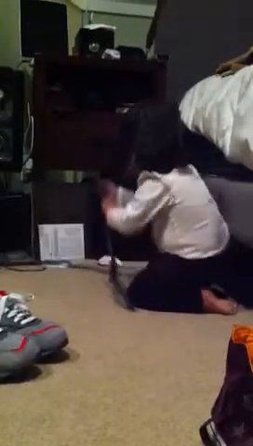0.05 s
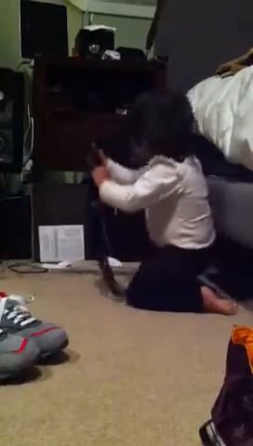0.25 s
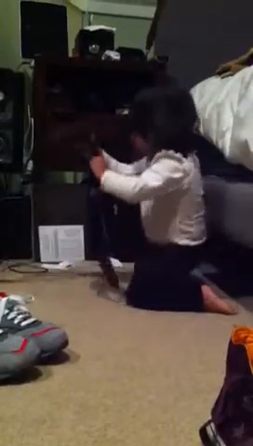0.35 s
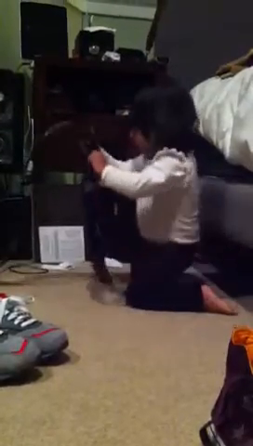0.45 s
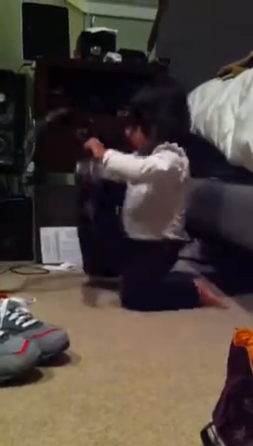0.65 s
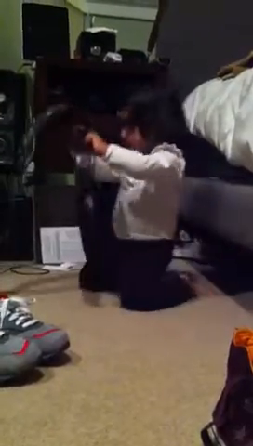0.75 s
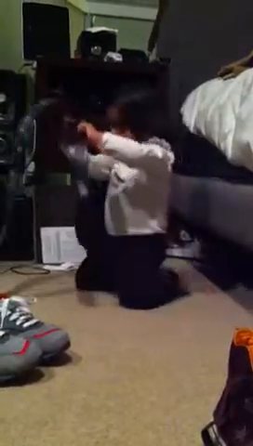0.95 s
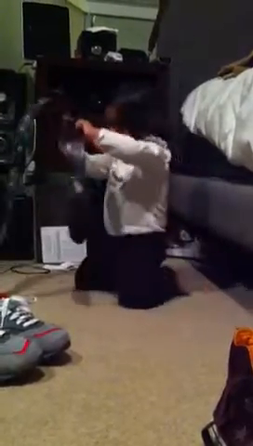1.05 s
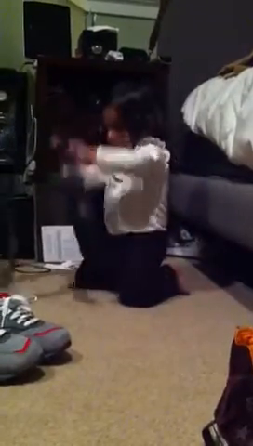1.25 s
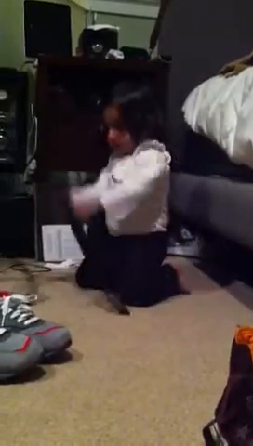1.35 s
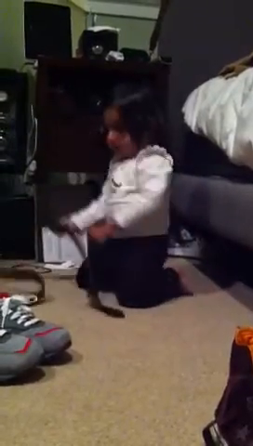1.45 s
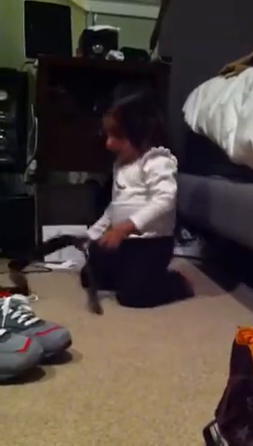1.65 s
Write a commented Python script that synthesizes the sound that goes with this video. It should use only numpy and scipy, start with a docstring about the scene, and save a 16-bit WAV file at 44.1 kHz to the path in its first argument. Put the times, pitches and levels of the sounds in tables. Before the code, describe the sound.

A metal belt buckle jangles with a strap slap, then clinks twice in a quiet bedroom.

```python
"""A strap's metal buckle jangles as the strap snaps taut with a slap, then clinks twice more as a child
lifts it and flings it down. Each contact clicks, chatters and rings the buckle's modes until the strap
mutes them. The slap is a noise crack with a hollow ring, answered by a small, quiet bedroom.
Soft bumps on the carpet and rustling clothes lie over a faint hiss."""
import sys
import numpy as np
from scipy import signal
from scipy.fft import rfft, irfft, next_fast_len
from scipy.io import wavfile
from scipy.ndimage import map_coordinates

SR = 44100
rng = np.random.default_rng(int(sys.argv[2]) if len(sys.argv) > 2 else 0)


def put_to_file(sound):
    """Save the sound as 16-bit audio at rate SR, in the file named by the first command-line argument."""
    columns = np.atleast_2d(sound).T  # one column per channel
    safe = np.clip(columns, -1, 1)
    whole_steps = np.round(safe * 32767)
    wavfile.write(sys.argv[1], SR, whole_steps.astype(np.int16))


N = 74970
EVENT_N = SR // 2
EVENT_S = np.arange(EVENT_N) / SR  # time axis of one event

# Rubbing fabric spectrum. Each row: frequency in Hz, level in dB.
CLOTH_SPECTRUM = [(35, -71), (60, -7), (138, -111), (162, -8), (276, -7), (332, -10.5), (381, -8),
                  (695, -9.5), (2840, -13), (3580, -14.5), (15000, -36.5)]


def amp(db):
    """Decibels to gain."""
    return 10 ** (np.asarray(db) / 20)


def unit(x):
    """Scale to rms 1."""
    return x / np.sqrt(np.mean(x ** 2) + 1e-20)


def along(points, hz):
    """Interpolate (Hz, value) points on a log frequency axis."""
    points_hz, values = np.transpose(points)
    return np.interp(np.log(hz + 1), np.log(points_hz + 1), values)


def fade(t60_s, t=EVENT_S):
    """Exponential decay, 60 dB in t60_s."""
    return np.exp(-np.log(1000) * t / t60_s)


def noise(spectrum, size=EVENT_N):
    """Coloured noise of rms 1."""
    gain = amp(along(spectrum, np.fft.rfftfreq(size, 1 / SR)))
    return unit(irfft(rfft(rng.standard_normal(size)) * gain, size))


def coloured(x, spectrum):
    """Minimum-phase filter with the given (Hz, dB) gain."""
    size = len(x)
    gain = amp(along(spectrum, np.fft.rfftfreq(size, 1 / SR)))
    cepstrum = irfft(np.log(gain), size)
    causal_fold = np.where(np.arange(size) < size // 2, 2, 0) - (np.arange(size) == 0)
    return irfft(rfft(x) * np.exp(rfft(cepstrum * causal_fold)), size)


def low_cut(x, hz):
    """High-pass: microphone low-cut that thins the bass of the slap and bumps."""
    return signal.sosfilt(signal.butter(3, hz, "highpass", fs=SR, output="sos"), x)


def add(track, start_s, sound):
    """Mix a sound in at start_s."""
    part = track[max(round(start_s * SR), 0):][:len(sound)]
    part += sound[:len(part)]


def mode(hz, t60_s, attack_s):
    """One damped vibration."""
    return np.sin(2 * np.pi * hz * EVENT_S) * fade(t60_s) * (1 - np.exp(-EVENT_S / attack_s))


def room_tail(build_s=0.0029):
    """Bedroom reverberation of unit energy, new for each source position."""
    # Room decay. Each row: frequency in Hz, T60 in seconds.
    decay = [(150, 0.12), (500, .23), (1500, 0.31), (4000, 0.19), (9000, 0.25), (15000, .17)]
    hz, t, bands = signal.stft(rng.standard_normal(EVENT_N), SR, nperseg=256)
    bands = bands * fade(along(decay, hz)[:, None], t)
    tail = signal.istft(bands, SR)[1][:EVENT_N] * (1 - np.exp(-EVENT_S / build_s))
    return tail / np.linalg.norm(tail)


def in_room(parts, wet_db):
    """Sum of parts through direct path and room tail, each keeping its energy."""
    response = (EVENT_S == 0) + amp(wet_db) * room_tail()
    heard = signal.fftconvolve(parts, response[None], axes=1)[:, :EVENT_N]
    return (np.linalg.norm(parts, axis=1) / np.linalg.norm(heard, axis=1)) @ heard


def hiss(level_db=-68):
    """Faint, steady noise floor."""
    # Hiss spectrum. Each row: frequency in Hz, relative level in dB.
    spectrum = [(15, -56), (25, -19), (53, -58), (91, -14.5), (261, -6.5), (461, -12.5), (587, -10.5),
                (637, -16.5), (769, -13), (1280, -13.5), (3050, -16.5), (15800, -20.5)]
    return amp(level_db) * noise(spectrum, N)


def clothes(grain_hz=53, grain_db=1, swish_s=1.3, swish_width_s=0.14, swish_db=-68.5):
    """Grainy rubbing as the child rises; the sleeves swish during the fling."""
    # Rubbing envelope. Each row: time in seconds, level in dB.
    rub_envelope = [(0, -70), (.04, -66), (.09, -71), (.15, -66), (.4, -74), (.47, -71.5), (.62, -71.5),
                    (.72, -65.5), (.84, -62.5), (.92, -71), (1.05, -89), (1.45, -74), (1.6, -73),
                    (1.66, -65.5), (1.7, -68)]
    # Sleeve spectrum. Each row: frequency in Hz, relative level in dB.
    sleeve_spectrum = [(300, -38), (750, 3), (1800, -27), (2600, -6), (3050, 1), (4300, -5.5), (5700, -3.5),
                       (7200, -20), (15000, -21)]
    t = np.arange(N) / SR
    grain = map_coordinates(rng.standard_normal(N), [t * grain_hz])
    rub = unit(noise(CLOTH_SPECTRUM, N) * amp(grain_db * grain))
    rub *= amp(np.interp(t, *np.transpose(rub_envelope)))
    swell = np.exp(-((t - swish_s) / swish_width_s) ** 2)
    return rub + amp(swish_db) * noise(sleeve_spectrum, N) * swell


def carpet_bumps(scuff_db=-21):
    """Dull knocks of a few cycles, each with a little scuff."""
    # Bumps. Each row: start in seconds, level in dB, pitch in Hz, T60 in seconds.
    knocks = [(0.153, -42, 295, 0.039), (0.165, -42.5, 207, 0.047), (1.458, -50, 167, 0.041),
              (1.466, -50.5, 264, 0.047), (1.611, -38, 160, 0.039)]
    out = np.zeros(N)
    for start_s, db, hz, t60_s in knocks:
        knock = mode(hz, t60_s, attack_s=0.0021)
        scuff = amp(scuff_db) * noise(CLOTH_SPECTRUM) * fade(t60_s)
        add(out, start_s, amp(db) * in_room([knock, scuff], wet_db=-2.5))
    return low_cut(out, hz=94)


def strap_slap(wet_db=4):
    """The strap snaps taut: sharp cracks fill the room, and the first also rings hollow."""
    # Cracks. Each row: start in seconds, gain in dB, T60 in seconds.
    slaps = [(0.1995, -2.5, 0.024), (0.2123, -7, 0.09)]
    # Leather's colour. Each row: frequency in Hz, gain in dB.
    leather = [(60, -5.5), (200, 2), (350, 2), (500, 0.5), (750, -2), (1300, -6.5), (2450, 1), (3600, -7),
               (4300, -7.5), (5300, -14.5), (6300, -10), (9000, -21.5), (15000, -34)]
    # Hollow ring. Each row: frequency in Hz, level in dB, T60 in seconds.
    hollow_modes = [(271, -40, .08), (357.5, -33, .13), (771, -40, 0.17), (2496, -29.5, 0.055)]
    out = np.zeros(N)
    for start_s, db, t60_s in slaps:
        crack = rng.standard_normal(EVENT_N) * fade(t60_s)
        slap = crack / np.linalg.norm(crack) + amp(wet_db) * room_tail()
        add(out, start_s, amp(db) * coloured(slap, leather))
    hollow = [amp(db) * mode(hz, t60_s, attack_s=0.0012) for hz, db, t60_s in hollow_modes]
    add(out, slaps[0][0], in_room(hollow, wet_db=-9))
    return low_cut(out, hz=176)


def buckle(attack_s=0.00044, muted_t60_s=0.02, wet_db=0.5):
    """Contacts click, chatter and ring the metal until it falls on the strap; the prong pings once."""
    # Buckle modes. Each row: frequency in Hz, relative level in dB, T60 in seconds.
    modes = [(1519, 0, .22), (3521, -2, .22), (5001, -16, .14), (6527, -8, .18), (6624, -2, .32),
             (7419, 3, .25), (9744, -19, .18), (10638, -9, .13), (10846, 0, .22), (11268, 0, .25),
             (13260, -25, .15), (15214, -13, .14), (15472, -3, .15), (15614, 0, .16)]
    # Contacts. Each row: start in seconds, six mode gains in dB, click level in dB, free ring in seconds.
    contacts = [(0.1538, -80, -63, -64, -62, -61.5, -57, -53, 0.08),
                (0.1995, -61, -50, -88, -55, -42, -73, -64, 0.12),
                (0.2168, -41.5, -42, -41.5, -32, -29, -24.5, -37.5, 0.018),
                (0.243, -79, -44, -40.5, -44, -70, -31.5, -47, 0.029),
                (0.2740, -71, -44, -53.5, -43, -45.5, -57, -74, 0.077),
                (0.4426, -105, -87, -64.5, -63.5, -80, -60, -96, 0.041),
                (0.5005, -54.5, -46, -54, -37.5, -48.5, -33, -58, 0.043),
                (0.5110, -52, -62, -43, -61, -65, -29.5, -46, 0.017),
                (0.5370, -51, -75, -48, -84, -57, -44, -58, 0.0092),
                (0.575, -94, -82, -64, -79, -67, -67, -76, 0.072),
                (1.4820, -64.5, -49.5, -48.5, -35, -47.5, -44, -47.5, 0.077),
                (1.4945, -97, -97, -52, -59, -63, -29.5, -69, 0.0074),
                (1.5320, -96, -56.5, -46, -82, -65, -50, -54, 0.011),
                (1.6770, -99, -69, -72, -64.5, -74, -72, -82, .05),
                (1.6880, -90, -72, -72, -67, -78, -53, -84, 0.054)]
    # Frequencies in Hz of those six gains.
    colour_hz = [1500, 3500, 7000, 10850, 11270, 15500]
    # Click spectrum. Each row: frequency in Hz, relative level in dB.
    click_spectrum = [(300, -8.5), (1500, -25), (4500, -2.5), (6000, 0.5), (8500, -16), (12000, -2),
                      (14800, -5.5), (16000, -30)]
    rebounds_per_s, chatter_db = 460, -8
    prong_s, prong_db = 0.28, -50.5
    out = np.zeros(N)
    for start_s, *colour_db, click_db, free_s in contacts:
        colour = list(zip(colour_hz, colour_db))  # each contact favours different modes
        mute = fade(muted_t60_s, np.maximum(EVENT_S - free_s, 0))
        rings = [amp(db + along(colour, hz)) * mode(hz, t60_s, attack_s) * mute
                 for hz, db, t60_s in modes]
        rebounds = rng.standard_normal(EVENT_N) * (rng.random(EVENT_N) < rebounds_per_s / SR)
        chatter = amp(chatter_db) * unit(coloured(rebounds, click_spectrum)) * fade(t60_s=0.12)
        click = noise(click_spectrum) * fade(t60_s=0.019)
        add(out, start_s, in_room(rings + [amp(click_db) * (click + chatter)], wet_db))
    prong = amp(prong_db) * mode(hz=4037, t60_s=0.2, attack_s=attack_s)
    add(out, prong_s, in_room([prong], wet_db))
    return out


def scene():
    """All sources over the hiss, mono."""
    return (buckle() + strap_slap() + carpet_bumps() + clothes() + hiss())[None]


def record(dry):
    """Steep low-pass band limit."""
    top_hz = 16000
    size = next_fast_len(N + SR // 2)
    hz = np.fft.rfftfreq(size, 1 / SR)
    return irfft(rfft(dry, size) / (1 + (hz / top_hz) ** 120), size)[:, :N]


dry = scene()
out = record(dry)
put_to_file(out)
```